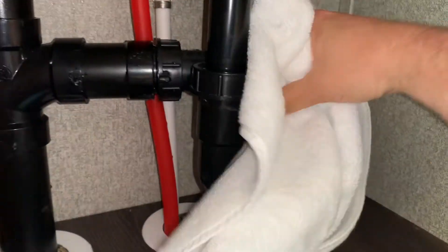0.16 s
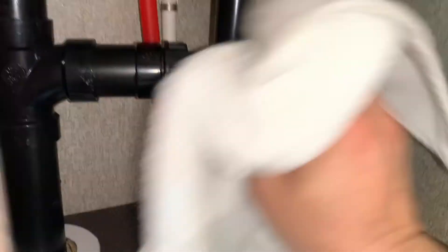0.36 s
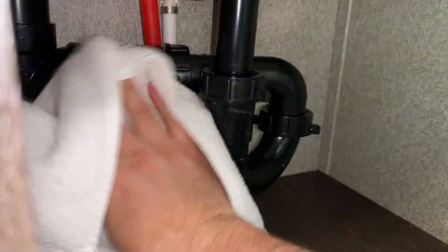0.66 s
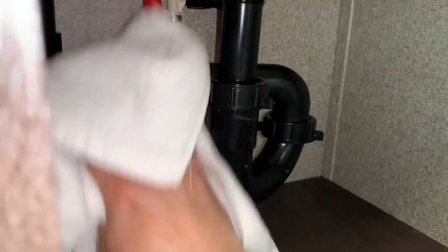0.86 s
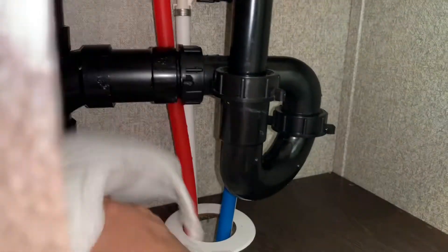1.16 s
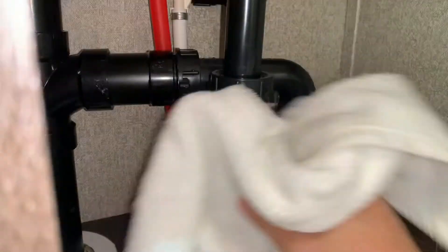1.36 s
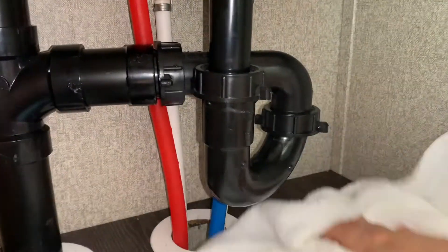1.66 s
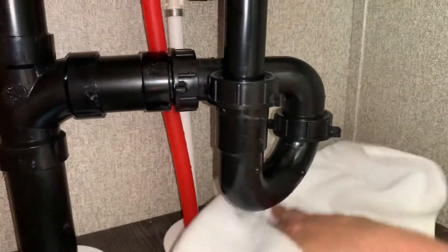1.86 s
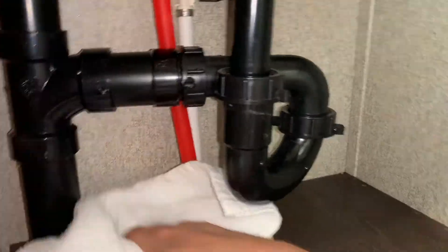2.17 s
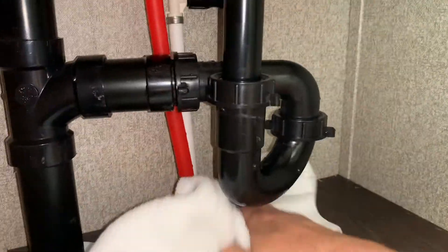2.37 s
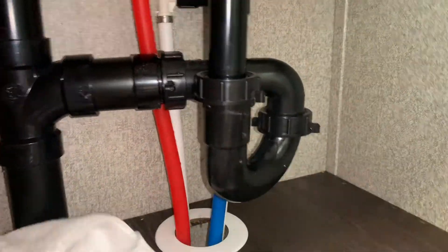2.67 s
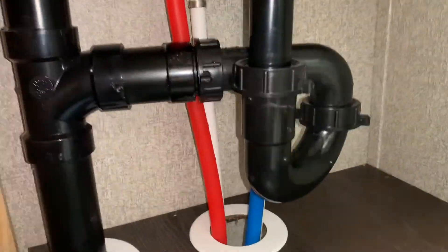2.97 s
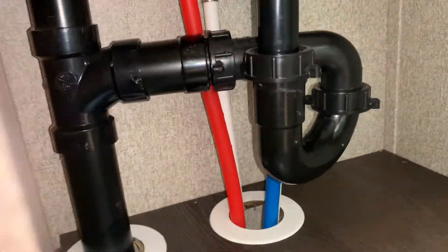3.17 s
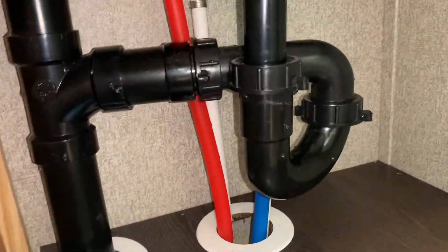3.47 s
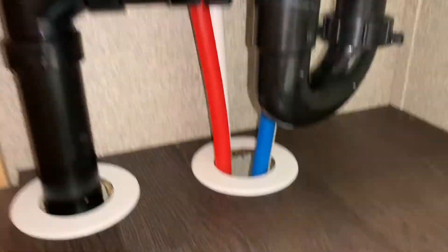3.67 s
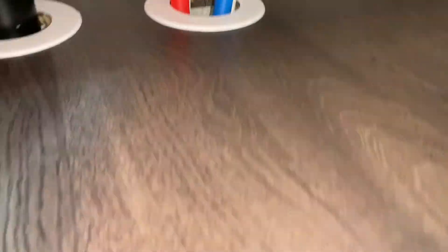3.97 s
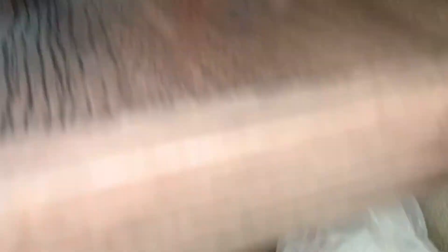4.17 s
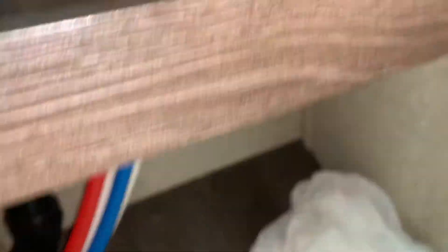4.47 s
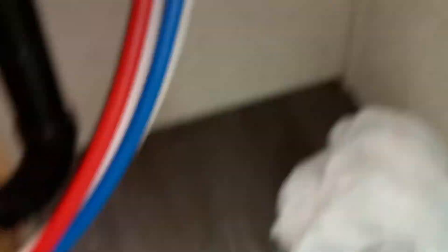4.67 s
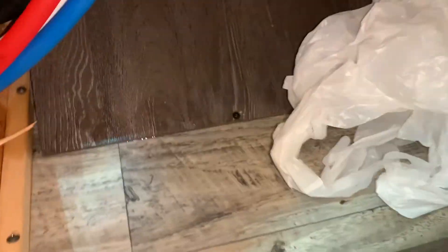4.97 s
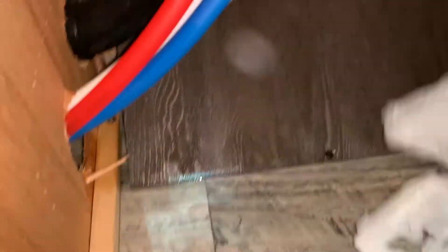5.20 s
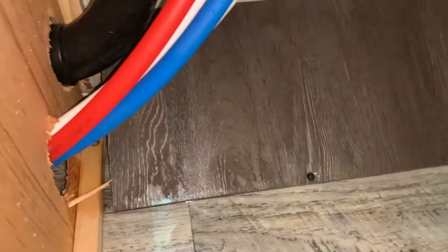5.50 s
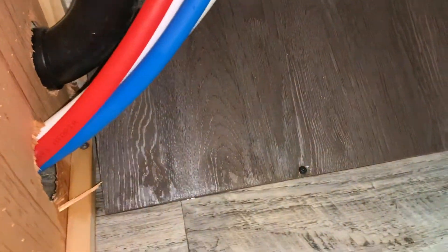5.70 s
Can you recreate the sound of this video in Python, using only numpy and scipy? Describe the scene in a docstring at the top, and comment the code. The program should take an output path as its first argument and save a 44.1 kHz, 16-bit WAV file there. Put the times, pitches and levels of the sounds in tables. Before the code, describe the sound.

A towel wipes the wooden floor of a small sink cabinet in quick, uneven strokes. The cloth hisses softly while the hand makes light, hollow knocks on the panels. About four seconds in, the handheld microphone is bumped with a sharp click and thump. The wiping goes on, ending in a louder rustle close by, over faint, low room noise.

```python
"""A towel wipes the floor of a small wooden sink cabinet: cloth hisses, ticks and sings in narrow bands.
The panels hum under the rubbing hand and ring at each knock, over steady room noise.
The handheld microphone is bumped: a sharp click and a quick falling chirp. It then listens
from a second spot, where a last loud rustle passes close by."""
import sys
import numpy as np
from scipy import signal
from scipy.fft import rfft, irfft
from scipy.io import wavfile

SR = 44100
rng = np.random.default_rng(int(sys.argv[2]) if len(sys.argv) > 2 else 0)


def waveform_to_disk(signal):
    """Save audio, clipped to [-1, 1], as 16-bit WAV at the path in sys.argv[1]."""
    frames = np.transpose(np.atleast_2d(signal))
    scaled = np.clip(frames, -1, 1) * 32767
    samples = np.round(scaled).astype(np.int16)
    wavfile.write(sys.argv[1], SR, samples)


N = 257544

# hand knocks: (time [s], level [dB], favoured pitch [Hz], small parts offset [dB],
# low panels offset [dB], scuff t60 [s], contact [s])
KNOCKS = [(0.04, -36, 536, -16.5, -6.5, 0.076, 0.0038), (0.085, -38.5, 396, -38, -35, 0.041, 0.0043),
          (0.112, -30, 446, -16, -32, 0.015, 0.0015), (0.51, -25.5, 478, -9, -19, 0.089, 0.005),
          (0.598, -35, 534, -34, -14.5, 0.24, 0.0027), (0.655, -48.5, 574, -31, 12.5, 0.033, 0.0035),
          (0.749, -33.5, 414, -44, -29, 0.053, 0.005), (1.03, -33, 447, -19.5, -11, 0.15, 0.007),
          (1.076, -18.5, 450, -5.5, -16.5, 0.087, 0.006), (1.146, -36, 730, -21, -15, 0.078, 0.005),
          (1.248, -41.5, 672, -9.5, -11.5, 0.14, 0.0045), (1.352, -48, 650, 1.5, -24, 0.067, 0.0049),
          (1.602, -31.5, 455, -12.5, -28, 0.13, 0.0028), (1.643, -18, 500, -11.5, -17, 0.072, 0.008),
          (1.903, -44.5, 516, -5, -17, 0.18, 0.0043), (2.053, -37.5, 606, -3.5, -9, 0.072, 0.0041),
          (2.214, -26.5, 470, -4.5, -32, 0.074, 0.0057), (2.319, -23, 560, -23, -51, 0.095, 0.0029),
          (2.915, -41.5, 590, -1.5, -5, 0.037, 0.0037), (3.238, -32.5, 482, -28, -10, 0.14, 0.006),
          (3.275, -14.5, 516, -15.5, -17, 0.049, 0.0019), (3.325, -13.5, 615, -15.5, -28, 0.087, 0.00454),
          (3.563, -26, 731, -10.5, -17, 0.095, 0.00295), (3.615, -39.5, 490, -8, -14, 0.047, 0.00354),
          (3.891, -25.5, 667, -13, -47, 0.12, 0.0032), (3.933, -24, 817, -12.5, -40, 0.1, 0.0034),
          (4.249, -38, 863, -7, -21, 0.034, 0.0019), (4.37, -14.5, 706, -7, -12.5, 0.074, 0.0098),
          (4.576, -32.5, 855, -1, -30, 0.022, 0.004), (4.709, -44, 345, -1, 14.5, 0.082, 0.004),
          (4.915, -26.5, 820, -1, -15.5, 0.062, 0.012), (5.412, -28.5, 345, -32, -2.5, 0.051, 0.0044),
          (5.566, -39, 1010, 0, 2, 0.092, 0.004), (5.628, -28, 760, -6, -35, 0.11, 0.00427),
          (5.738, -34.5, 1030, -15, -21, 0.03, 0.003), (5.78, -19, 508, -12, -26, 0.067, 0.006)]
# cabinet modes: (frequency [Hz], t60 [s], gain at first spot [dB], gain at second spot [dB])
LOW_PANEL_MODES = [(121.4, 0.098, 3, -2), (149.1, 0.17, 1.5, -6.5), (184.3, 0.16, -2.5, -10),
                   (242, 0.035, -8, -7)]
MIDDLE_PANEL_MODES = [(349.5, 0.049, -0.5, -7), (398, 0.071, -3, -11), (440.5, 0.026, -8, -20.5),
                      (537, 0.03, -9.5, -15), (626, 0.03, -8.5, -16.5), (700, 0.031, -8.5, -11),
                      (804, 0.015, -10, -2.5), (1008, 0.042, -22.5, -6.5)]
SMALL_PART_MODES = [(1328, 0.018, -1.5, -12), (1553, 0.021, -4, -8.5), (1899, 0.02, -12.5, -14),
                    (2168, 0.0091, -3, -14.5), (2578, 0.0038, -4, -14), (4210, 0.0017, -6, -10.5)]
# low panel hum under the resting hand: (time [s], level [dB])
LOW_HUM = [(0, -57), (1.5, -56), (3.9, -60.5), (4.5, -55.5), (5.2, -52.5), (5.84, -47)]
# noise spectra: (frequency [Hz], relative density [dB])
ROOM_SPECTRUM = [(24, -42), (40, -5.5), (643, -16), (1110, -37.5), (12900, -46), (15800, -72)]
CLOTH_SPECTRUM = [(500, -22), (1200, 0.5), (2300, -1.5), (7000, 0), (14000, -2.5), (15800, -8)]
# towel strokes: (start [s], end [s], start hiss [dB], end hiss [dB], lean on middle panels [dB])
STROKES = [(0.059, 0.358, -68.5, -69.5, -62), (0.436, 0.674, -78, -75, -62),
           (1.185, 1.302, -68.5, -65.5, -57.5), (1.315, 1.607, -70.5, -73, -64.5),
           (1.67, 1.872, -58, -61.5, -60.5), (1.878, 2.087, -60, -62, -52),
           (2.173, 2.364, -63, -65.5, -57.5), (2.42, 2.506, -65, -58, -49.5), (2.548, 2.639, -62, -65, -62),
           (2.704, 3.088, -58.5, -73.5, -59.5), (3.218, 3.453, -54.5, -64, -60),
           (3.468, 3.638, -55.5, -58.5, -54), (3.661, 3.86, -59, -64.5, -85),
           (3.873, 3.94, -57, -53.5, -71), (4.037, 4.141, -61, -66.5, -93), (4.162, 4.52, -61, -56, -65),
           (4.569, 4.764, -60, -59, -54), (4.786, 4.916, -51.5, -65, -50), (4.94, 5.18, -64, -94, -67.5),
           (5.181, 5.39, -35, -47.5, -54), (5.356, 5.442, -41, -46.5, -55.5),
           (5.449, 5.56, -50, -44.5, -60), (5.556, 5.655, -46.5, -43.5, -46),
           (5.656, 5.805, -49, -54.5, -51)]
# crisp ticks: (time [s], peak [dB], frequency [Hz])
TICKS = [(0.111, -47, 6250), (0.475, -51.5, 4100), (1.602, -54.5, 2350), (2.3185, -49.5, 7010),
         (3.7579, -41.5, 12220)]
# rubbing resonances: (start [s], end [s], centre [Hz], width [Hz], level [dB])
SINGING_BANDS = [(1.298, 1.59, 1620, 56, -66), (1.343, 1.622, 4550, 300, -69.5),
                 (2.84, 3.111, 4510, 350, -74), (3.464, 3.775, 1680, 49.3, -60),
                 (3.887, 3.915, 1840, 50, -44), (3.888, 3.918, 5100, 740.7, -45.5),
                 (3.89, 3.922, 3180, 108, -48.5), (3.946, 3.97, 1222, 86, -29.5),
                 (3.596, 3.631, 3700, 1300, -50.5), (5.687, 5.775, 1053, 91, -42),
                 (5.595, 5.7, 1905, 90, -50.5)]
# microphone ports at each spot: (frequency [Hz], right lag [rad], coherence [0-1], left over right [dB])
PORTS_FIRST = [(41.5, 2.24, 0.94, -1.5), (221, 2.634, 0.93, 1), (435, 4.326, 0.97, -1), (676, 6.25, 1, 0.5),
               (1060, 8.52, 0.81, 0), (2220, 7.7, 0.19, 0)]
PORTS_SECOND = [(36.6, 1.46, 1, -3), (249, 0.28, 0.94, -6.5), (415, 4.7, 0.79, -1), (630, 6.3, 0.73, -2.5),
                (3000, 9.1, 0.2, 0), (15100, 42.8, 0.19, -2.5)]

# resting hand: (first spot [dB], second spot [dB])
REST_HISS_DB, REST_LEAN_DB, REST_SMALL_DB = (-77.5, -70), (-64.5, -73), (-73.5, -73.5)
SWELL_S, STOP_DB_PER_S, HISS_ARCH_DB, LEAN_ARCH_DB = 0.0049, 398, 1.5, 4
LOW_LEAN_SHARE, TILT_DB_PER_OCT_PER_DB = 0.22, 0.08
BUMP_S, BUMP_DB, CLICK_RE_BUMP_DB, CLICK_T60_S = 3.9611, -13, -11, 0.005
ROOM_DB, CUTOFF_HZ = -64, 15850


def from_db(db):
    """Level to gain."""
    return 10 ** (np.asarray(db) / 20)


def unit_rms(x):
    """Scale to unit power."""
    return x / np.sqrt(np.mean(x ** 2) + 1e-20)


def add(track, start_s, piece):
    """Mix a piece into a track."""
    part = track[int(start_s * SR):][:len(piece)]
    part += piece[:len(part)]


def per_bin(table):
    """Spectrum columns at every FFT bin."""
    hz, *columns = np.transpose(table)
    return [np.interp(np.log(np.arange(N // 2 + 1) * SR / N + 1), np.log(hz), c) for c in columns]


def drift(rate_hz):
    """Slow random curve, unit power."""
    knots = rng.standard_normal(int(rate_hz * N / SR) + 2)
    return unit_rms(np.interp(np.linspace(0, len(knots) - 1, N), np.arange(len(knots)), knots))


def grains(grain_db):
    """White noise of uneven grains, unit power."""
    return unit_rms(rng.standard_normal(N) * from_db(grain_db * np.minimum(rng.exponential(1, N), 5)))


def coloured(spectrum, grain_db):
    """Grains shaped to a spectrum, unit power."""
    return unit_rms(irfft(rfft(grains(grain_db)) * from_db(per_bin(spectrum)[0]), N))


def by_spot(first, second):
    """Crossfade from the first listening spot to the second at the bump."""
    moved = np.clip((np.arange(N) / SR - BUMP_S) / .01, 0, 1)
    return first + (second - first) * moved


def scuff(t60_s, rise_s):
    """Envelope of cloth dragging on after a knock, 0.2 s long."""
    t = np.arange(SR // 5) / SR
    return (1 - np.exp(-2 * t / rise_s)) ** 2 * from_db(-60 * t / np.clip(t60_s, .01, .2))


def room():
    """Steady, mostly low room noise."""
    return from_db(ROOM_DB) * coloured(ROOM_SPECTRUM, grain_db=0)


def panels(modes, drive_db, knock_db, falloff_db_per_oct, scuff_db):
    """Rubbing feeds each mode with noise; a knock swings it up, then scuffs it."""
    starts_s, _, favoured_hz, _, _, tails_s, contacts_s = np.transpose(KNOCKS)
    out, drive = np.zeros(N), from_db(drive_db)
    for hz, t60_s, first_db, second_db in modes:
        r, w = from_db(-60 / (t60_s * SR)), 2 * np.pi * hz / SR
        scatter_db, phases = (rng.standard_normal((len(starts_s), 2)) * [2.87, 0.93]).T
        sizes = from_db(knock_db - falloff_db_per_oct * abs(np.log2(hz / favoured_hz)) + scatter_db)
        rub = drive * from_db(2 * drift(10))   # the hand wanders over the mode shape
        blows = np.zeros(N)
        for start_s, size, phase, tail_s, contact_s in zip(starts_s, sizes, phases, tails_s, contacts_s):
            press_s = contact_s * min(1, 1400 / hz)   # high modes answer the first touch
            drag_s = tail_s * min(1, 1100 / hz)
            n = np.arange(int(SR * (press_s + 2 / hz)))   # low modes swing up slower
            push = 4 / len(n) * np.hanning(len(n)) * np.cos(w * (n - len(n)) + phase)
            add(blows, start_s - press_s / 2, size * push)
            add(rub, start_s - press_s / 2, size * from_db(scuff_db) * scuff(drag_s, press_s))
        force = blows + rub * grains(grain_db=5) * np.sqrt(2 * (1 - r * r))   # unit rub, unit power out
        ringing = signal.lfilter([0, np.sin(w)], [1, -2 * r * np.cos(w), r * r], force)
        out += ringing * from_db(by_spot(first_db, second_db))
    return out


def cabinet(lean_db, slip_db):
    """Low panels, middle panels and small parts follow the hand's lean and knocks."""
    _, knock_db, _, small_offset_db, low_offset_db, *_ = np.transpose(KNOCKS)
    swing_db = lean_db - by_spot(*REST_LEAN_DB)
    hum_db = np.interp(np.arange(N) / SR, *np.transpose(LOW_HUM))
    low_db = hum_db + LOW_LEAN_SHARE * swing_db + 0.098 * slip_db
    small_db = by_spot(*REST_SMALL_DB) + swing_db + 0.36 * slip_db
    out = panels(LOW_PANEL_MODES, low_db, knock_db + low_offset_db, falloff_db_per_oct=0, scuff_db=0)
    out += panels(MIDDLE_PANEL_MODES, lean_db + slip_db, knock_db, falloff_db_per_oct=13, scuff_db=-5.5)
    return out + panels(SMALL_PART_MODES, small_db, knock_db + small_offset_db,
                        falloff_db_per_oct=2.5, scuff_db=-1)


def struck_wood(slip_db):
    """The wood under the hand rings at each knock's favoured pitch."""
    out, t = np.zeros(N), np.arange(SR // 5) / SR
    for start_s, knock_db, hz, _, _, tail_s, contact_s in KNOCKS:
        envelope = from_db(knock_db - 6.5) * scuff(0.93 * tail_s, contact_s)
        add(out, start_s - contact_s / 2, envelope * np.sin(2 * np.pi * hz * t))
    return out * from_db(slip_db / 2)


def strokes():
    """Hiss and lean [dB]: each stroke swells, arches mid-way and stops; powers add."""
    t = np.arange(N) / SR
    hiss_power, lean_power = from_db(2 * by_spot(*REST_HISS_DB)), from_db(2 * by_spot(*REST_LEAN_DB))
    for start_s, end_s, start_db, end_db, lean_db in STROKES:
        along = np.clip((t - start_s) / (end_s - start_s), 0, 1)
        arch = np.sin(np.pi * along)
        swell_db = -20 / np.log(10) * np.logaddexp(0, (start_s - t) / SWELL_S)   # half up at start_s
        edge_db = swell_db - STOP_DB_PER_S * np.maximum(t - end_s, 0)
        ramp_db = start_db + (end_db - start_db) * along
        hiss_power += from_db(2 * (ramp_db + HISS_ARCH_DB * arch + edge_db))
        lean_power += from_db(2 * (lean_db + LEAN_ARCH_DB * (arch - 1) + edge_db))
    return 10 * np.log10(hiss_power), 10 * np.log10(lean_power)


def hiss_envelope(hiss_db, slip_db):
    """Fluttering strokes plus a short crack at each knock."""
    envelope = from_db(hiss_db + slip_db / 4 + 1.1 * drift(150))
    for start_s, knock_db, _, small_offset_db, _, tail_s, contact_s in KNOCKS:
        crack = from_db(knock_db + small_offset_db - 19) * scuff(0.57 * tail_s, contact_s)
        add(envelope, start_s - contact_s / 2, crack)
    return envelope


def folds(hiss_db):
    """Half-octave band gains: they drift as the folds shift; louder hiss is brighter."""
    tilt_db_per_oct = TILT_DB_PER_OCT_PER_DB * (hiss_db + 60)
    return [from_db(2.2 * drift(22) + tilt_db_per_oct * (k / 2 - 3)) for k in range(11)]


def cloth_hiss(fold_gains):
    """Sliding cloth: grainy noise in half-octave bands from 500 Hz up."""
    spectrum = rfft(coloured(CLOTH_SPECTRUM, grain_db=3))
    band = 2 * np.log2(np.arange(N // 2 + 1) * SR / N / 500 + 1e-9)
    return sum(gain * irfft(spectrum * np.clip(1 - abs(band - k), 0, 1), N)
               for k, gain in enumerate(fold_gains))


def ticks(t60_s=0.039):
    """Brief rings, broadened by phase noise."""
    out, t = np.zeros(N), np.arange(SR // 50) / SR
    for start_s, peak_db, hz in TICKS:
        phase = 2 * np.pi * hz * t + 0.89 * rng.standard_normal(len(t))
        add(out, start_s, from_db(peak_db - 60 * t / t60_s) * np.sin(phase))
    return out


def singing(slip_db):
    """Rubbing noise through narrow resonances, fluttering with stick and slip."""
    out = np.zeros(N)
    for start_s, end_s, hz, width_hz, db in SINGING_BANDS:
        r, w = np.exp(-np.pi * width_hz / SR), 2 * np.pi * hz / SR
        n = int((end_s - start_s) * SR)
        band = signal.lfilter([1, 0, -1], [1, -2 * r * np.cos(w), r * r], rng.standard_normal(SR // 2))
        add(out, start_s, from_db(db) * unit_rms(band)[-n:] * np.hanning(n) ** 0.14)
    return out * from_db(0.64 * slip_db)


def microphone_bump():
    """A sharp click and a quick chirp, pitch falling as 1/t; duller and softer on the right."""
    t = np.arange(1, SR // 16) / SR
    envelope = np.clip(t / .0007, 0, 1) / (1 + (t / .0095) ** 3.2)
    chirp = envelope * np.cos(8 * np.log(t / .00206))
    click = from_db(CLICK_RE_BUMP_DB - 60 * t / CLICK_T60_S) * rng.standard_normal(len(t))
    left = np.zeros(N)
    add(left, BUMP_S, from_db(BUMP_DB) * (chirp + click))
    right = from_db(-4) * signal.sosfilt(signal.butter(2, 800, fs=SR, output="sos"), left)
    return np.array([left, right])


def stereo_width(shared, independent, table):
    """Two spectra to stereo: right mixes a lagging copy of left with the independent one."""
    lag_rad, coherence, pan_db = per_bin(table)
    coherence = np.clip(coherence, 0, 1)
    right = coherence * np.exp(-1j * lag_rad) * shared + np.sqrt(1 - coherence ** 2) * independent
    return irfft([shared * from_db(pan_db / 2), right * from_db(-pan_db / 2)], N)


def scene():
    """Two random draws of the same gestures make the stereo wiping; the bump is added."""
    hiss_db, lean_db = strokes()
    slip_db = 3.9 * drift(40)   # stick and slip shakes all panels together
    envelope = hiss_envelope(hiss_db, slip_db)
    fold_gains = folds(hiss_db)
    draws = [rfft(cabinet(lean_db, slip_db) + struck_wood(slip_db) + envelope * cloth_hiss(fold_gains)
                  + ticks() + singing(slip_db) + room()) for _ in range(2)]
    wiping = by_spot(stereo_width(*draws, PORTS_FIRST), stereo_width(*draws, PORTS_SECOND))
    bass_cut = signal.butter(3, 68, "high", fs=SR, output="sos")   # the ports pass little airborne bass
    return signal.sosfilt(bass_cut, wiping) + microphone_bump()


def record(dry):
    """Steep low-pass."""
    return signal.sosfilt(signal.ellip(12, .5, 70, CUTOFF_HZ, fs=SR, output="sos"), dry)


dry = scene()
out = record(dry)
waveform_to_disk(out)
```